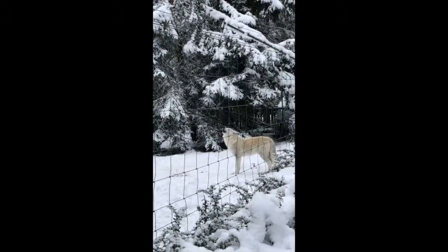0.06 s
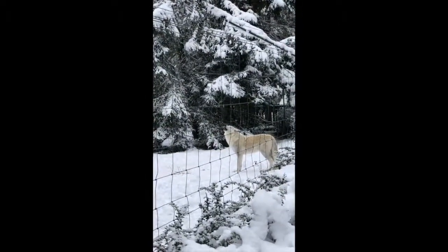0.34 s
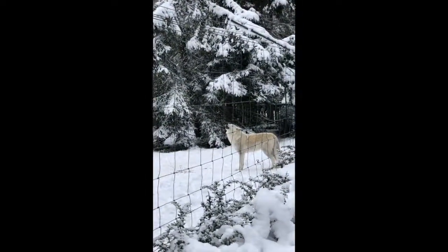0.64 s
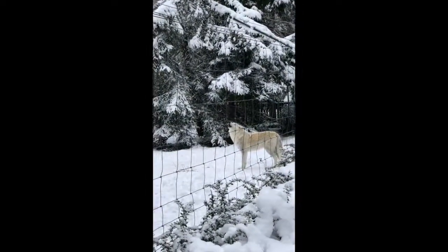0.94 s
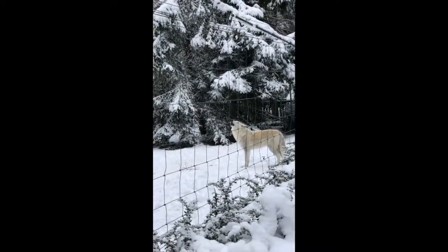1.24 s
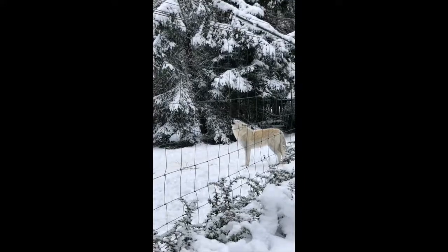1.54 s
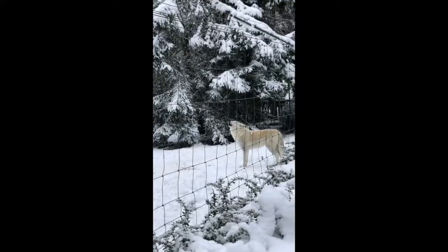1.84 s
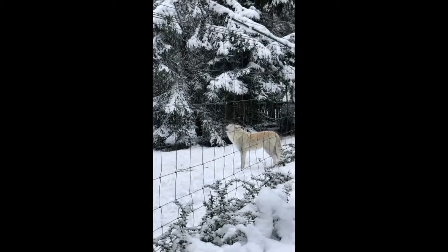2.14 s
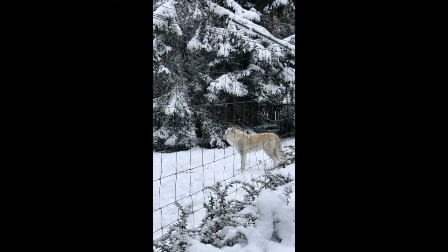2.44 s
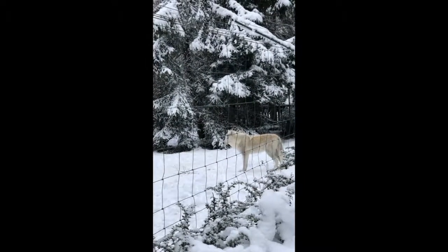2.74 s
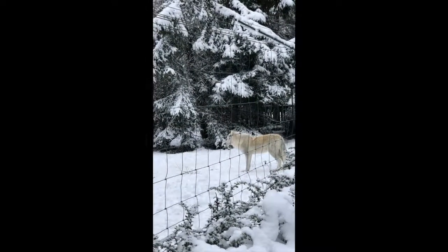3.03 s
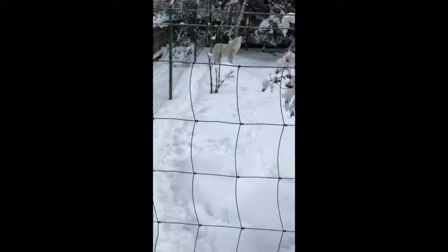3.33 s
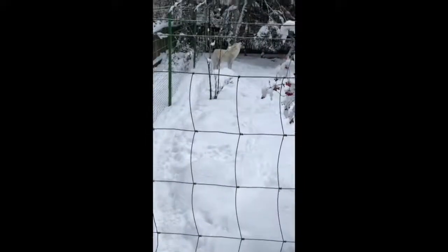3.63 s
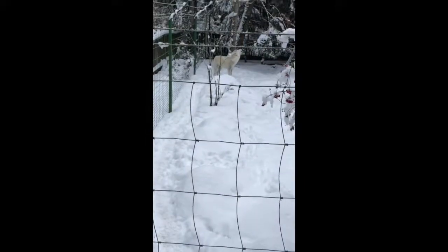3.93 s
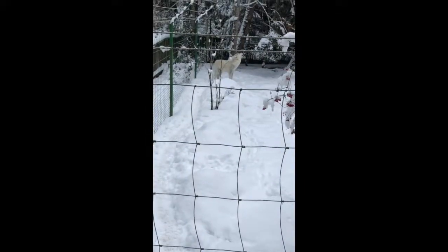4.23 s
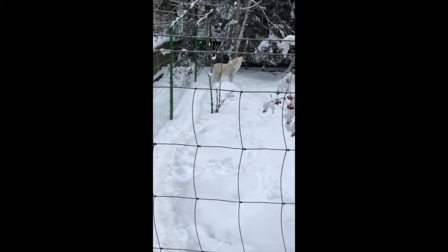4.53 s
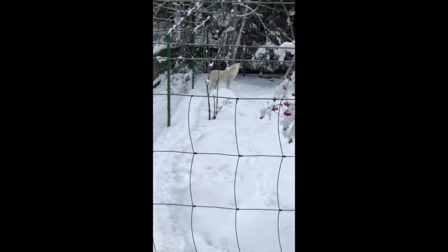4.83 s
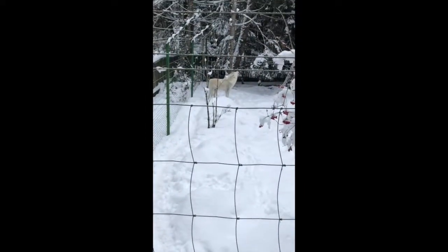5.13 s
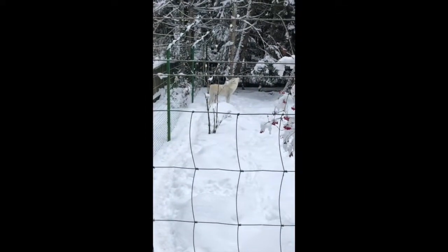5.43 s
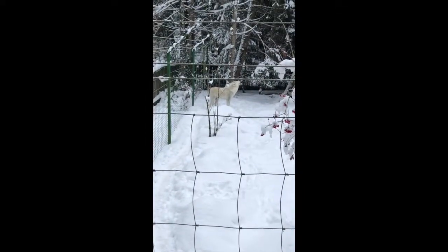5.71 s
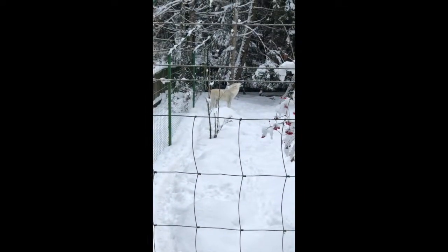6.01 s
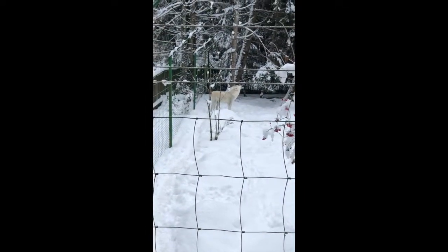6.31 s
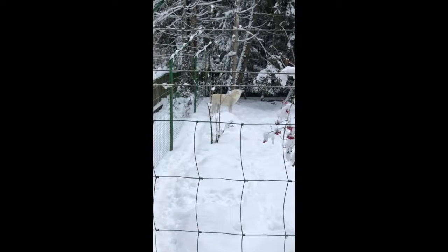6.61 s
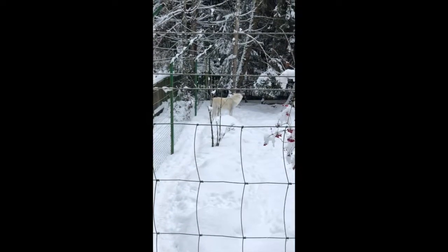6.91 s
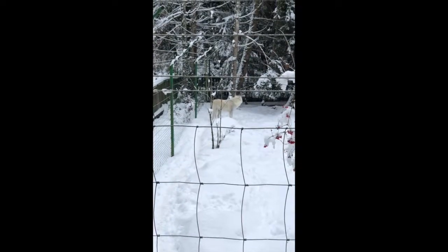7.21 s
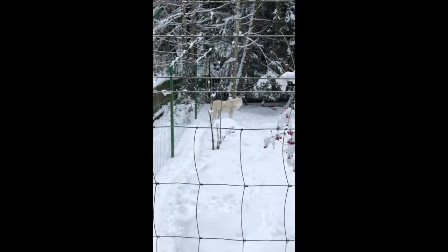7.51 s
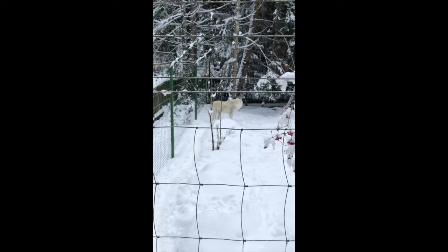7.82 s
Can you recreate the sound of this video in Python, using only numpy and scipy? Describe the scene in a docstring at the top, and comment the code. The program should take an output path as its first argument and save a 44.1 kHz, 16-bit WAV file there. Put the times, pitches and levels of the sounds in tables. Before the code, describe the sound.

Two distant wolves howl one after the other, each long note sinking to a low moan in quiet outdoor air.

```python
"""Two wolves in a snowy wood

Two distant wolves howl one after the other. Each howl is a clean stack of partials that slides down
through the throat's resonances and sinks to a low moan; the first carries a thin nasal whistle.
Small birds, a far caw and soft rustles lie in the quiet air, and the trees give a faint echo."""
import sys
import numpy as np
from scipy import signal
from scipy.fft import rfft, irfft
from scipy.io import wavfile
from scipy.ndimage import uniform_filter1d

SR = 44100
rng = np.random.default_rng(int(sys.argv[2]) if len(sys.argv) > 2 else 0)


def persist_wave(psi):
    """Save psi, clipped to +-1, as 16-bit WAV."""
    counts = np.round(np.clip(psi, -1, 1) * 32767).astype(np.int16)
    wavfile.write(sys.argv[1], SR, np.atleast_2d(counts).T)


N = 351036
TIME = np.arange(N) / SR
HELD_HZ = 300  # reference pitch, near both wolves' held notes

# the first howl's pitch and effort: t/s, f/Hz, level/dB
FIRST_HOWL = [(0.0, 450.5, -36.9), (0.13, 446.0, -38.8), (0.24, 447.3, -38.4), (0.335, 418.8, -40.3),
              (0.375, 349.0, -38.4), (0.52, 338.4, -37.9), (0.8, 330.3, -37.3), (1.02, 330.1, -35.8),
              (1.26, 320.0, -37.6), (1.52, 322.3, -36.1), (1.75, 316.9, -37.4), (1.95, 298.0, -37.4),
              (2.13, 278.6, -40.7), (2.25, 239.2, -56.0), (2.33, 214.8, -65.1), (2.42, 164.1, -64.9),
              (2.6, 126.8, -76.3), (2.79, 142.3, -75.2), (2.9, 134.9, -76.2), (3.08, 156.1, -72.9),
              (3.17, 192.5, -70.9), (3.27, 208.2, -69.5)]
# the second howl's pitch, effort and brightness: t/s, f/Hz, level/dB, tilt/(dB per octave)
SECOND_HOWL = [(3.373, 335.6, -53, 13.5), (3.46, 327, -42.5, -1.8), (3.72, 310.4, -46, -4),
               (3.87, 300.2, -48.5, -4), (4.28, 288.3, -46, -9), (4.44, 284.5, -43.5, -11.5),
               (4.5, 280.1, -49.5, -4), (4.76, 277.6, -51, -2.9), (4.95, 279.6, -50, -4.5),
               (5.11, 289, -44.5, -11.5), (5.28, 287.6, -44, -11), (5.45, 277, -49.5, 0.3),
               (5.535, 245.4, -52.5, 3.5), (5.731, 229.2, -56, 1.1), (5.88, 225.4, -54.5, 0.3),
               (6.19, 211.3, -59, 0.6), (6.26, 206.8, -54, -3), (6.379, 195.2, -59.5, -0.6),
               (6.52, 170.1, -54.5, -4.5), (6.59, 147.5, -52, -2), (6.68, 142.7, -50.5, -3),
               (6.88, 127.2, -52.5, -9), (7.08, 113.5, -50, -14), (7.6, 113.6, -56, -18)]
# colour of each throat and muzzle: f/Hz, level/dB
FIRST_THROAT = [(130, 14), (200, -3), (240, -14.5), (300, -13), (430, -1), (510, 1), (590, -16.5),
                (700, -21.5), (860, -10), (1000, -31), (1150, -61), (1400, -57.5), (1700, -65)]
SECOND_THROAT = [(110, -25), (210, -10), (300, -4), (430, -9), (510, 0), (605, 1), (690, -10), (770, -30),
                 (850, -1), (970, -25.5), (1080, -59), (1400, -75.5)]
# mid-register swell of partial two: base level/dB, added lift/dB, centre pitch f/Hz, width/octaves
FIRST_REGISTER = (1.6, 12, 242.5, 0.19)
SECOND_REGISTER = (-7, 23.5, 200.5, 0.4632)
# upper resonances of each muzzle: f/Hz, width/Hz, level/dB
FIRST_MUZZLE = [(1547, 166, -1), (2023, 340, -3), (2530, 58, -14)]
SECOND_MUZZLE = [(1640, 150, -1.5), (2130, 120, -1.5), (2584, 58, -4.5)]
# reedy edge of each voice: send level/dB, reediest pitch f/Hz, width/octaves
FIRST_REED = (-30, 318, 0.42)
SECOND_REED = (-37.5, 295, 0.44)
# resonances of the first wolf's nose: f/Hz, width/Hz, level/dB
NOSE = [(5180, 160, 2.5), (8640, 150, -1), (9700, 140, -5)]
# colour of the breath rushing through each muzzle: f/Hz, level/dB
FIRST_BREATH = [(90, -24.5), (170, -10), (400, 0), (750, -2.5), (1200, -6), (1900, -10.5), (2800, -18),
                (5000, -26.5), (12000, -29.5)]
SECOND_BREATH = [(150, -19.5), (400, 2), (500, 5), (700, -12.5), (850, 1.5), (1050, -20), (1300, -16),
                 (2400, -16), (2850, -23), (3500, -17), (6500, -35)]
# bird notes: t/s, length/s, start f/Hz, middle f/Hz, end f/Hz, level/dB
BIRD_NOTES = [(2.896, 0.2, 3400, 4570, 5940, -90.5), (5.16, 0.09, 7130, 7720, 7200, -95),
              (5.36, .05, 7000, 7410, 7700, -92), (7.194, 0.082, 7565, 7400, 7270, -88),
              (7.347, 0.09, 6920, 7280, 6700, -86), (7.61, 0.13, 3750, 4400, 4750, -96),
              (7.69, 0.058, 5100, 5260, 5550, -95)]
# pitch and effort of the caw: t/s, f/Hz, level/dB
CAW = [(4.05, 463, -83), (4.085, 473.6, -69.5), (4.13, 475, -76.5), (4.17, 466, -85)]
# colour of the caw: f/Hz, level/dB
CAW_COLOUR = [(470, 2), (940, 4.5), (1420, -7.5), (2300, -31), (3900, -10), (4700, -16), (6000, -29)]
# rustles, ticks, bumps and faint narrow tones: t/s, length/s, centre f/Hz, width/octaves, level/dB
# apart from these, the row at 2.178 s is a brief ringing overtone of the first wolf as its howl falls
SWELLS = [(0.132, 0.071, 2300, 0.22, -78), (0.377, 0.25, 1780, 0.0074, -73), (.7, 0.41, 1760, 0.06, -77),
          (0.726, 0.31, 3600, 0.41, -79.5), (0.803, 0.52, 9500, 0.46, -84.5),
          (0.978, 0.25, 3970, 0.31, -79.5), (1.258, 0.16, 1380, 0.048, -75.5),
          (1.696, .06, 1990, 0.37, -81), (2.178, 0.12, 1750, .05, -72), (3.8, 0.11, 130, 0.54, -70.5),
          (3.883, 0.25, 3650, .35, -80), (5.502, 0.92, 3040, .35, -86.5), (6.099, .2, 62, 0.3, -73),
          (6.584, .016, 4770, .2, -74), (6.872, 0.014, 4750, 0.13, -78), (7.5, 0.064, 1542, .07, -81)]
# colour of the wood's still air: f/Hz, level/dB
AIR_COLOUR = [(15, -47), (25, -12.5), (62, -3.5), (100, -5.7), (152, -2.5), (209, -6.5), (331, -7),
              (782, -19), (1020, -18.5), (2840, -25), (4150, -26.5), (7490, -30.5), (12200, -33.5),
              (15500, -38)]


def first_wolf():
    """A high note breaks down to a long held one, then dulls to a moan as the air runs out."""
    gate, hz, effort_db = curves(FIRST_HOWL)
    end_s = FIRST_HOWL[-1][0]
    tilt_db = -3 + 2.5 * np.log2(hz / HELD_HZ) - 9 * spent(end_s)
    tone, cycles = voice(hz, effort_db, tilt_db, FIRST_THROAT, FIRST_REGISTER, jitter=0.0015)
    ring = muzzle_ring(tone, cycles, hz, FIRST_REED, FIRST_MUZZLE)
    whistle = nose_whistle(cycles, hz, end_s)
    puffs = breath(cycles, hz, end_s, FIRST_BREATH, held_db=-75.5, db_per_octave=9)
    return gate * (tone + ring + whistle + puffs)


def second_wolf(attack_s=0.015):
    """A held note steps down twice and dies away as a low groan."""
    gate, hz, effort_db, tilt_db = curves(SECOND_HOWL)
    start_s, end_s = SECOND_HOWL[0][0], SECOND_HOWL[-1][0]
    attack = np.clip((TIME - start_s) / attack_s, 0, 1)
    tone, cycles = voice(hz, effort_db, tilt_db, SECOND_THROAT, SECOND_REGISTER, jitter=0.002)
    ring = muzzle_ring(tone, cycles, hz, SECOND_REED, SECOND_MUZZLE)
    puffs = breath(cycles, hz, end_s, SECOND_BREATH, held_db=-71.5, db_per_octave=5)
    return gate * attack * (tone + ring + puffs)


def voice(hz, effort_db, tilt_db, throat, register, jitter, shimmer=0.022):
    """Vocal folds that grow unsteady as the pitch sinks; gives the tone and its phase in cycles."""
    slack = HELD_HZ / hz
    cycles = np.cumsum(hz * (1 + jitter * slack * wander(31))) / SR
    base_db, lift_db, middle_hz, octaves = register
    second_db = base_db + lift_db * bell(hz, middle_hz, octaves)
    stack = partials(cycles, hz, throat, tilt_db, second_db, roll_db=-2.5, count=8)
    return from_db(effort_db) * stack * (1 + shimmer * slack * wander(22)), cycles


def partials(cycles, hz, throat, tilt_db=0, second_db=0, roll_db=0, waver_db=0.47, count=12):
    """Harmonics slide through the throat's colour, each wavering on its own."""
    out = np.zeros(N)
    for k in range(1, count + 1):
        db = tilt_db * np.log2(k) + second_db * (k == 2) + roll_db * max(k - 4, 0)
        gain = colour_at(throat, k * hz) * from_db(db + waver_db * wander(7.3))
        out += gain * sine(k * cycles)
    return out


def muzzle_ring(tone, cycles, hz, reed, muzzle, flutter_db=2.0):
    """High partials ride the voice's loudness and light up as they cross the muzzle's resonances."""
    send_db, middle_hz, octaves = reed
    loudness = np.sqrt(abs(uniform_filter1d(tone ** 2, size=1500)))
    out = np.zeros(N)
    for k in range(4, 11):
        gain = sum(from_db(db) / (1 + (2 * (k * hz - centre) / width) ** 2)
                   for centre, width, db in muzzle)
        out += gain * from_db(flutter_db * wander(14)) * sine(k * cycles)
    return from_db(send_db) * loudness * bell(hz, middle_hz, octaves) * out


def nose_whistle(cycles, hz, end_s, held_db=-89, db_per_octave=6.5, airy=0.97, waver_db=1.9):
    """Fold pulses and air sing in narrow resonances of the nose, more strongly at high pitch."""
    pulses = unit(sum(np.cos(2 * np.pi * k * cycles) for k in range(10, 36)))
    drive = pulses + airy * rng.standard_normal(N)
    sung = np.zeros(N)
    for centre, width, peak_db in NOSE:
        peak = signal.iirpeak(centre, centre / (2 * width), SR)
        sung += from_db(peak_db) * signal.lfilter(*peak, signal.lfilter(*peak, drive))
    db = held_db + db_per_octave * np.log2(hz / HELD_HZ) + waver_db * wander(7.1)
    return from_db(db) * sung / sung[TIME < end_s].std()


def breath(cycles, hz, end_s, colour, held_db, db_per_octave, run_out_db=-24):
    """Air puffed once a cycle: stronger at high pitch, running out as the howl ends."""
    db = held_db + db_per_octave * np.log2(hz / HELD_HZ) + run_out_db * spent(end_s)
    return from_db(db) * noise(colour) * (1 + 0.5 * np.cos(2 * np.pi * cycles))


def spent(end_s, run_out_s=0.62):
    """Ramps from 0 to 1 as a wolf's air runs out."""
    return np.clip(1 - (end_s - TIME) / run_out_s, 0, 1)


def birds(flutter=0.43):
    """Small birds: thin sine glides with a fast flutter in level."""
    out = np.zeros(N)
    for s, length, start, middle, end, db in BIRD_NOTES:
        progress = np.linspace(0, 1, int(length * SR))
        hz = np.polyval(np.polyfit([0, 0.5, 1], [start, middle, end], 2), progress)
        envelope = signal.windows.tukey(len(hz), 0.5)
        add(out, s, from_db(db) * envelope * sine(np.cumsum(hz) / SR))
    return out * (1 + flutter * wander(60))


def caw(jitter=0.014):
    """One far caw: a harmonic stack made hoarse by fast pitch jitter."""
    gate, hz, db = curves(CAW)
    cycles = np.cumsum(hz * (1 + jitter * wander(120))) / SR
    return gate * from_db(db) * partials(cycles, hz, CAW_COLOUR)


def rustles_and_overtone(grain_db=3.7):
    """Swells of band-passed grainy noise: rustles and ticks, plus a brief overtone of the first wolf."""
    out = np.zeros(N)
    for s, length, centre, octaves, db in SWELLS:
        n = int(length * SR)
        grains = rng.standard_normal(n) * from_db(grain_db * np.minimum(rng.exponential(1, n), 2))
        hz = np.fft.rfftfreq(n, 1 / SR)
        band = np.exp(-0.5 * (np.log2((hz + 1) / centre) / octaves) ** 2)
        swell = np.sin(np.pi * np.arange(n) / n)
        add(out, s, from_db(db) * swell * unit(irfft(rfft(grains) * band, n)))
    return out


def tree_echo(send, t60_s, predelay_s, lowpass_hz, echoes_per_s=1500):
    """Sparse, dull echoes scattered by trunks and snowy branches."""
    t = np.arange(SR) / SR
    taps = rng.standard_normal(SR) * (rng.random(SR) < echoes_per_s / SR)
    taps *= (t > predelay_s) * from_db(-60 * t / t60_s)
    taps /= np.linalg.norm(taps)
    return signal.lfilter(*signal.butter(1, lowpass_hz, fs=SR), signal.fftconvolve(send, taps)[:N])


def still_air(level_db=-73, swell_db=0.5):
    """The bed: low murmur and faint hiss of the open air."""
    return from_db(level_db + swell_db * wander(2.1)) * noise(AIR_COLOUR)


def from_db(db):
    """Decibels to gain."""
    return 10 ** (np.asarray(db) / 20)


def unit(x):
    """Scales to rms 1."""
    return x / np.sqrt(np.mean(x ** 2) + 1e-20)


def sine(cycles):
    """Sine oscillator of rms 1."""
    return np.sqrt(2) * np.sin(2 * np.pi * cycles)


def bell(hz, middle_hz, octaves):
    """1 at the middle pitch, falling away on both sides."""
    return np.exp(-(np.log2(hz / middle_hz) / octaves) ** 2)


def colour_at(colour, hz):
    """Gain of an EQ curve (f/Hz, level/dB) on a log-frequency axis."""
    f, db = np.transpose(colour)
    return from_db(np.interp(np.log(hz + 1), np.log(f + 1), db))


def curves(rows, fade_s=0.008):
    """A soft gate over the table's span, then each column as an automation curve."""
    s, *columns = np.transpose(rows)
    gate = np.clip(np.minimum(TIME - s[0], s[-1] - TIME) / fade_s, 0, 1)
    return [gate] + [np.interp(TIME, s, column) for column in columns]


def noise(colour):
    """Coloured noise of rms 1."""
    gain = colour_at(colour, np.fft.rfftfreq(N, 1 / SR))
    return unit(irfft(rfft(rng.standard_normal(N)) * gain, N))


def wander(rate_hz):
    """Random modulation of rms 1, moving up to about rate_hz."""
    coarse = TIME[::32]
    hz = np.fft.rfftfreq(len(coarse), coarse[1])
    spectrum = rfft(rng.standard_normal(len(coarse))) / (1 + (hz / rate_hz) ** 4)
    return np.interp(TIME, coarse, unit(irfft(spectrum, len(coarse))))


def add(mix, s, sound):
    """Mixes a sound in at time s."""
    part = mix[max(round(s * SR), 0):][:len(sound)]
    part += sound[:len(part)]


def scene():
    """Mono mix: wolves and birds with their echoes, over rustles and still air."""
    first, second, calls = first_wolf(), second_wolf(), birds() + caw()
    wolf_send = from_db(-21.5) * first + from_db(-16.5) * second
    wolf_echo = tree_echo(wolf_send, t60_s=0.83, predelay_s=0.015, lowpass_hz=3000)
    bird_echo = tree_echo(from_db(3.5) * calls, t60_s=0.42, predelay_s=0.004, lowpass_hz=8800)
    return (first + second + wolf_echo + calls + bird_echo + rustles_and_overtone() + still_air())[None]


def record(dry):
    """The microphone sheds deep bass; the sound drops out briefly between howls; the top is cut."""
    low_cut_hz, high_cut_hz = 35, 15700
    gap_start_s, gap_end_s = 3.359, 3.374
    thinned = signal.sosfilt(signal.butter(4, low_cut_hz, "highpass", fs=SR, output="sos"), dry)
    gate = uniform_filter1d(1.0 * ((TIME < gap_start_s) | (TIME > gap_end_s)), size=60)
    high_cut = signal.firwin(511, high_cut_hz, window=("kaiser", 9), fs=SR)
    return signal.oaconvolve(thinned * gate, high_cut[None], "same")


dry = scene()
out = record(dry)
persist_wave(out)
```